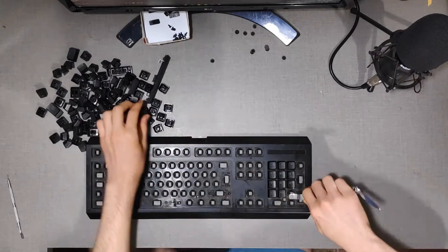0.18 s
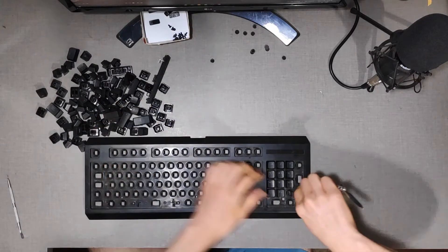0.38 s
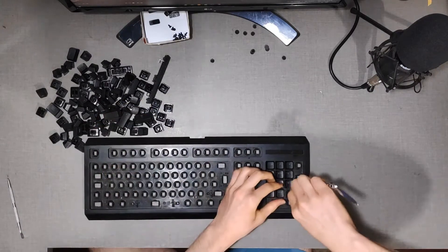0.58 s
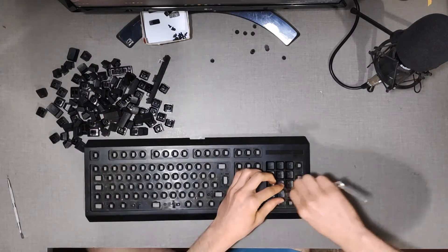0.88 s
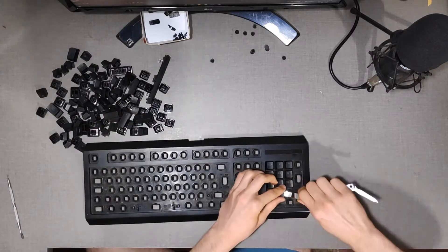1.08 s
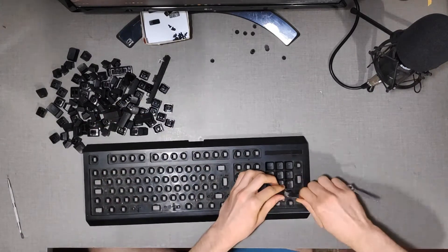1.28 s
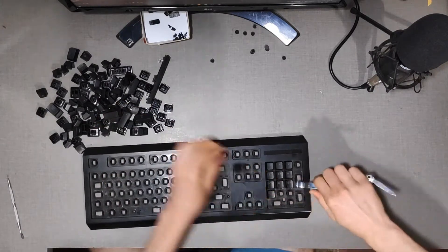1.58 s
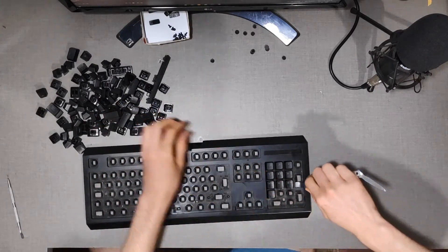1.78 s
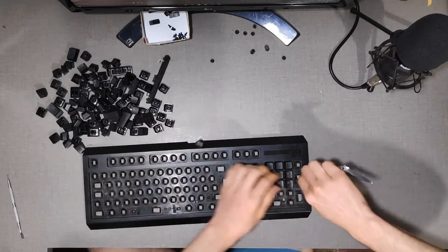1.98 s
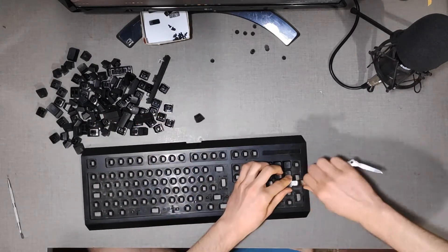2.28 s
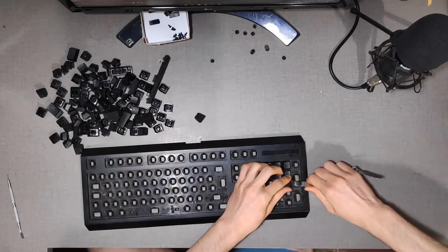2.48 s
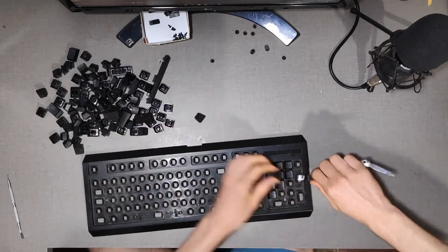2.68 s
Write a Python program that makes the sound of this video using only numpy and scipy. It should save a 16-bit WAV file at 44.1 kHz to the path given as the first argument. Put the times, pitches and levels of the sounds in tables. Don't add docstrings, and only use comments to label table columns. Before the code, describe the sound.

Bright plastic keycaps rattle onto a pile, then duller knocks and snaps follow as more are pried from a keyboard; another cap clatters down midway, then prying resumes, in a small hard room with low hum.

```python
import sys
import numpy as np
from scipy import signal
from scipy.fft import rfft, irfft
from scipy.io import wavfile
from scipy.ndimage import uniform_filter1d

SR = 44100
rng = np.random.default_rng(int(sys.argv[2]) if len(sys.argv) > 2 else 0)


def put_to_file(sound):
    columns = np.atleast_2d(sound).T
    safe = np.clip(columns, -1, 1)
    whole_steps = np.round(safe * 32767)
    wavfile.write(sys.argv[1], SR, whole_steps.astype(np.int16))


def convert_level_to_amplitude(level_db):
    exponent = np.asarray(level_db, float) / 20
    return 10 ** exponent


N = 125685
MID_SIDE = np.array([[1], [-1]])


def unit(x):
    return x / np.sqrt(np.mean(x ** 2))


def read(table, x, log=False):
    points = np.array(table, float)
    scale = np.log if log else np.asarray
    return np.interp(scale(x), scale(points[:, 0]), points[:, 1])


def colour(x, table, share=1):
    hz = np.maximum(np.arange(N // 2 + 1) * SR / N, 1)
    return irfft(rfft(x) * convert_level_to_amplitude(share * read(table, hz, True)), N)


def add(out, s, x):
    i = int(s * SR)
    out[i:i + len(x)] += x[:N - i]


def pops(table):
    out, t = np.zeros(N), np.arange(6144) / SR
    for s, hz, db, t60 in table:
        decay = convert_level_to_amplitude(db - 60 * t / max(t60, .002))
        onset = np.minimum(t * hz / 0.96, 1)
        add(out, s, decay * np.sin(2 * np.pi * hz * t) * onset)
    return out


def hum():
    # (frequency [Hz], density [dB per Hz])
    hum_colour = [(15, -57), (30, -48), (64, -6.5), (103, -6.5), (191, -10.5), (226, -23), (620, -37.5),
                  (720, -32.5), (1150, -73), (15000, -100)]
    mid, side = colour(rng.standard_normal((2, N)), hum_colour)
    side = signal.sosfilt(signal.butter(1, 500, "high", fs=SR, output="sos"), side)
    low_cut = signal.sosfilt(signal.butter(4, 130, "high", fs=SR, output="sos"), mid)
    return (mid + side * MID_SIDE) * convert_level_to_amplitude(-49.5) / low_cut.std()


def hiss():
    # (frequency [Hz], density [dB per Hz])
    hiss_colour = [(1200, -5), (3200, -2), (7500, -4), (9800, -2), (13000, -7), (15000, -28)]
    high_pass = signal.butter(2, 700, "high", fs=SR, output="sos")
    noise = signal.sosfilt(high_pass, rng.standard_normal((2, N)))
    return unit(colour(noise, hiss_colour)) * convert_level_to_amplitude(-69.5)


def desk(t):
    # (frequency [Hz], level [dB], T60 [s])
    desk_modes = [(40.1, -10, 0.6), (68.3, -12.5, 0.3), (96.94, -2, 0.31)]
    # (time [s], level [dB])
    push = [(0, -37.5), (.25, -42), (.33, -41), (.56, -38), (.61, -27), (.68, -30.5), (.8, -34.5),
            (1.1, -38.5), (1.36, -37), (1.48, -39), (1.97, -64.5), (2.1, -36.5), (2.23, -47.5),
            (2.47, -36.5), (2.57, -49), (2.7, -39), (2.79, -62)]
    out = 0
    for hz, db, t60 in desk_modes:
        pole = np.exp(2j * np.pi * hz / SR - np.log(1000) / (t60 * SR))
        z = signal.lfilter([1], [1, -pole], rng.standard_normal(N))
        z = signal.lfilter([1], [1, -pole], z)
        limited = z / (np.abs(z) + 1.2 * np.abs(z).mean())
        out = out + convert_level_to_amplitude(db) * unit(limited.imag)
    return out * convert_level_to_amplitude(uniform_filter1d(read(push, t), size=800) - 0.5)


def thumps():
    # (time [s], frequency [Hz], peak level [dB], T60 [s])
    case_knocks = [(.598, 275, -21, 0.083), (.60, 97.3, -25, .3), (.638, 413, -36, 0.054),
                   (.66, 95.6, -24.5, .4), (.815, 285, -27, 0.18), (1.04, 160, -27.5, 0.095),
                   (1.356, 303, -19, 0.1), (1.36, 109.6, -22, 0.17), (1.533, 320, -36, .08),
                   (2.10, 100.6, -25.5, .15), (2.065, 198, -36, 0.058), (2.2, 277, -28.5, .1),
                   (2.53, 288, -29, 0.36)]
    return pops(case_knocks)


def rubbing(t, curve, tone, per_s):
    stutter_s, stutter_db, grain_db = 0.018, 5.5, 2
    present = rng.random(N) < per_s / SR
    grains = present * rng.standard_normal(N)
    grains = grains * convert_level_to_amplitude(grain_db * np.minimum(rng.exponential(size=N), 3))
    size = int(stutter_s * SR)
    slip = unit(uniform_filter1d(uniform_filter1d(rng.standard_normal(N), size), size))
    return unit(colour(grains * convert_level_to_amplitude(stutter_db * slip), tone)) * convert_level_to_amplitude(read(curve, t))


def palm_shoves(t):
    # (time [s], level [dB])
    shove = [(.46, -91), (.565, -40), (0.587, -24), (.63, -36.5), (.68, -36), (.72, -47), (.8, -83),
             (1.49, -49), (1.535, -31), (1.6, -71), (2.7, -80.5), (2.744, -55), (2.8, -96)]
    # (frequency [Hz], density [dB per Hz])
    shove_colour = [(200, -8.5), (700, -13), (2000, -14.5), (4500, -22.5), (8000, -27.5), (15000, -43)]
    return rubbing(t, shove, shove_colour, per_s=1500)


def finger_rub(t):
    # (time [s], level [dB])
    rub_curve = [(0, -63), (.12, -88.5), (.2, -58), (.26, -39.5), (.55, -49.5), (.76, -53.5), (.97, -61),
                 (1.1, -49), (1.28, -53.5), (1.7, -69), (1.88, -35.5), (2.05, -40), (2.17, -37.5),
                 (2.38, -40.5), (2.62, -55.5), (2.758, -43.5), (2.8, -83)]
    # (frequency [Hz], density [dB per Hz])
    rub_colour = [(250, -18), (700, -1), (1100, -0.5), (2200, 0), (4000, -5), (8000, -5), (10000, -9.5),
                  (15000, -19)]
    return rubbing(t, rub_curve, rub_colour, per_s=500)


def stem_pops():
    # (time [s], frequency [Hz], peak level [dB], T60 [s])
    stem_modes = [(.1588, 6900, -50, 0.022), (.160, 2000, -56, .01), (.2281, 8300, -20.5, .008),
                  (.2466, 7550, -16.5, .008), (.281, 7900, -25, 0.011), (.3159, 7680, -28, .008),
                  (.330, 2820, -20, .01), (.3548, 8000, -15, 0.0091), (.360, 8400, -14, 0.013),
                  (.3908, 7690, -15, .006), (.393, 4440, -15.5, 0.0082), (.5289, 7800, -16, .008),
                  (.5519, 7950, -15, 0.0075), (.7549, 4400, -22, 0.0092), (.7995, 2060, -14.5, 0.013),
                  (.810, 8100, -18, .008), (1.033, 1060, -19.5, 0.014), (1.2149, 1330, -29.5, 0.02),
                  (1.348, 1980, -14, 0.013), (1.361, 1850, -10.5, 0.017), (1.5322, 2030, -29, 0.025),
                  (1.7393, 6460, -15, 0.011), (1.7393, 2300, -18, 0.028), (1.8356, 7840, -12, 0.01),
                  (1.9164, 7050, -17, .008), (1.9668, 7360, -16, .008), (1.968, 10040, -6, .008),
                  (2.1219, 7530, -14.5, 0.011), (2.2726, 1730, -35, 0.0071), (2.3289, 6300, -23, .005),
                  (2.427, 2140, -2.5, 0.007), (2.428, 4820, -14, .011), (2.513, 1840, -7, 0.015),
                  (2.528, 3740, -36, 0.0097), (1.40, 2860, -22, .01), (2.735, 1930, -36, 0.022)]
    return pops(stem_modes)


def echo():
    # (frequency [Hz], T60 [s])
    room_t60 = [(250, 0.43), (1000, 0.23), (3000, 0.29), (7000, 0.24), (14000, 0.26)]
    t, tail = np.arange(SR // 3) / SR, 0
    for hz in 125 * 2. ** np.arange(7.5, step=.75):
        band = signal.butter(2, [hz / 1.3, min(hz * 1.3, 20000)], "band", fs=SR, output="sos")
        mid, side = rng.standard_normal((2, len(t)))
        wide = min((hz / 1200) ** 0.57, 1)
        both = (mid + wide * side * MID_SIDE) / np.hypot(1, wide)
        tail = tail + signal.sosfilt(band, both) * convert_level_to_amplitude(-60 * t / read(room_t60, hz, True))
    tail = tail * np.clip(t / 0.0011, 0, 1) ** 2
    return tail / np.sqrt(np.sum(tail ** 2) / 2)


def room(near, x, lag):
    places, wet_db = 8, 5
    place, wet = np.arange(N) * places / N, np.zeros((N, 2))
    for k in range(places + 1):
        here = np.flatnonzero(np.abs(place - k) < 1)
        part = x[here] * np.cos(np.pi / 2 * (place[here] - k))
        add(wet, (here[0] + .5) / SR, signal.fftconvolve(part[None], echo(), axes=1).T)
    direct = np.array([np.roll(near, int(round(lag))), near])
    return direct + convert_level_to_amplitude(wet_db) * wet.T


def ring(modes, luck, size=512):
    detune, spread_db = 0.069, 6
    m, t = np.array(modes, float), np.arange(size)[:, None] / SR
    hz = m[:, 0] * (1 + detune * luck[:len(m)])
    db = m[:, 1] + spread_db * luck[::-1][:len(m)]
    phase = np.pi * (np.arange(len(m)) % 2)
    decay = convert_level_to_amplitude(db - 60 * t / np.maximum(m[:, 2], .001))
    y = (decay * np.sin(2 * np.pi * np.minimum(hz, 17000) * t + phase)).sum(axis=1)
    return y / np.sqrt(np.sum(y ** 2) / 40)


def lasting(modes, t60):
    return np.c_[modes, np.full(len(modes), t60)]


def knocks(table, walls):
    # (frequency [Hz], level [dB])
    body_modes = [(1090, -3), (1375, -19.5), (1740, 15), (2080, -64), (2420, 8.5), (2900, 16.5)]
    # (frequency [Hz], level [dB], T60 [s])
    case_modes = [(163, -27, 0.062), (189.3, 1.5, 0.095), (270.7, 4.5, 0.12), (297, -1.5, 0.155),
                  (420, -6, 0.055), (550, 10, 0.022), (780, -33, 0.027)]
    wall_gain_db, body_gain_db, thud_gain_db = -7, 2.5, 10.5
    wall_t60_s, body_t60_s, ring_t60_s = 0.0029, 0.0038, 0.009
    rattle_s, rattle_db = 0.0025, -3.5
    blend, near, thud = np.zeros((3, N))
    hz = np.arange(3000, 16000, step=650.)
    thin, body = np.c_[hz, read(walls, hz, True)], np.array(body_modes, float)
    luck, late = rng.standard_normal((len(table), 3, 40)), rng.random((len(table), 3))
    soft_hit = np.minimum(np.arange(512) / 12, 1)
    soft_thud = np.minimum(np.arange(6144) / 60, 1)
    for (s, wall_db, body_db, thud_db, near_db), lk, lt in zip(table, luck, late):
        wall, hollow = convert_level_to_amplitude(wall_db + wall_gain_db), convert_level_to_amplitude(body_db + body_gain_db)
        wall_ring = wall * ring(lasting(thin, wall_t60_s), .18 * lk[0])
        add(blend, s, wall_ring + hollow * ring(lasting(body, body_t60_s), .3 * lk[1]))
        for k in range(3):
            hit = wall * ring(lasting(thin, ring_t60_s), 0.99 * lk[k])
            hit = hit + hollow * ring(lasting(body, ring_t60_s), lk[k, 10:30])
            contact_s = s + rattle_s * (k + lt[k]) * (k > 0)
            add(near, contact_s, hit * soft_hit * convert_level_to_amplitude(rattle_db * k + near_db))
        boom = ring(case_modes, 0.5 * lk[0], size=6144) * soft_thud
        add(thud, s + 0.0028, convert_level_to_amplitude(thud_db + thud_gain_db) * boom)
    return blend, near, thud


def pile_knocks():
    # (time [s], wall ring [dB], cap body [dB], case thud [dB], directness [dB])
    landings = [(0.159, -38.5, -58, -82, -15), (0.221, -14, -32, -81, -7), (0.2443, -27, -38, -44, 2),
                (0.2817, -24, -49, -72, 7), (0.3285, -12, -29, -64, -6.5), (0.3542, -9, -28, -72, 1),
                (0.3614, -33, -28, -54, 2), (0.3903, -13.5, -38, -67, 7), (0.418, -32, -29, -64, 4.8),
                (0.5289, -13.5, -32.5, -42, 1.5), (0.5401, -36, -30.5, -50, -4),
                (0.5532, -13, -30, -42, -16), (1.7385, -3, -16, -32, -4), (1.836, -10.5, -29, -46, 5.5),
                (1.8614, -12.5, -54, -67, -25), (1.8707, -22.5, -47, -67, 13),
                (1.9167, -11, -32, -42, -0.5), (1.9663, -5, -32, -50, 1.5), (1.991, -18.5, -56, -63, 4),
                (1.7505, -23, -29.5, -45, 10), (1.978, -16, -44, -66, 6)]
    # (frequency [Hz], level [dB])
    pile_walls = [(3000, -3), (5500, -1), (7600, 1), (9000, -5), (12500, -6), (14000, -15.5), (15500, -20)]
    return knocks(landings, pile_walls)


def key_knocks():
    # (time [s], wall ring [dB], cap body [dB], case thud [dB], directness [dB])
    pryings = [(0.4844, -37, -33, -33, -3), (0.5844, -9.5, -20, -28.5, -14), (0.6094, -16, -33, -52, 2.5),
               (0.6644, -26, -27, -38, 4), (0.7547, -16, -28, -42, -8), (0.7985, -7, -20, -39, -9),
               (0.8294, -23.5, -30.5, -37, 5.5), (1.0041, -34, -34.5, -49, -7),
               (1.0316, -18, -23, -38.5, -13), (1.2151, -23, -32.5, -51, 2.5), (1.2498, -22, -30, -68, -23),
               (1.3488, 0.5, -13.5, -47, -9.5), (1.3584, -6.5, -52, -35.5, -14),
               (2.0594, -34, -30.5, -38.5, -2.5), (2.1164, -20, -45, -36.5, -17),
               (2.1221, -14, -56, -47, 2.5), (2.1534, -13.5, -22.5, -45, -29),
               (2.2513, -22, -39, -40.5, 6.5), (2.2727, -27, -45.5, -43, 12.5),
               (2.3291, -20, -46, -41, -3.5), (2.4259, -7.5, -26.5, -66, 1.5),
               (2.5122, -8, -19.5, -31.5, -9), (2.5282, -4.5, -20, -37, -1.5),
               (0.993, -35, -38.5, -54.5, -14), (1.026, -27.5, -49, -53, 2)]
    # (frequency [Hz], level [dB])
    key_walls = [(3000, -2), (5000, 1.5), (7600, -2), (9500, -7.5), (12500, -7), (14000, -14.5),
                 (15500, -25)]
    return knocks(pryings, key_walls)


def scene():
    t = np.arange(N) / SR
    background = hum() + hiss()
    shaking = desk(t) + 0.1 * desk(t) * MID_SIDE
    rub, pop = finger_rub(t) + palm_shoves(t), stem_pops()
    pile, pile_near, pile_thud = pile_knocks()
    keys, keys_near, key_thud = key_knocks()
    thud = key_thud + pile_thud
    keyboard = room(keys_near + .5 * rub + pop, keys + rub + 0.41 * pop + 0.66 * thud, lag=-1.4)
    landing = room(pile_near, pile, lag=5.5)
    return keyboard + landing + 0.7 * thud + thumps() + shaking + background


def follow(x, release_s):
    fall = np.arange(len(x)) / (release_s * SR)
    return np.exp(np.maximum.accumulate(np.log(x + 1e-9) + fall) - fall)


def roll_off(x):
    return signal.sosfilt(signal.butter(12, 16820, fs=SR, output="sos"), x)


def record(dry):
    # (frequency [Hz], left minus right [dB])
    port_colour = [(200, 0.5), (1000, -1.35), (4400, 0), (8000, -7), (10500, 3.5), (14000, 4.5)]
    threshold_db, ratio, release_s = -30, 1.098, 0.029
    x = np.array([colour(dry[0], port_colour, 0.72), colour(dry[1], port_colour, -0.54)])
    envelope = follow(uniform_filter1d(np.abs(x).mean(axis=0), size=441), release_s)
    gain = np.maximum(envelope / convert_level_to_amplitude(threshold_db), 1) ** (1 / ratio - 1)
    x = x * uniform_filter1d(gain, size=221)
    rounded = np.tanh(x / .9) * .9
    mix = signal.sosfilt(signal.ellip(6, .3, 50, 15600, fs=SR, output="sos"), rounded)
    return roll_off(mix)


dry = scene()
out = record(dry)
put_to_file(out)
```